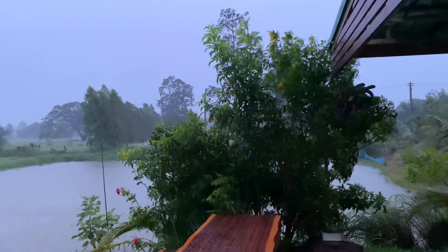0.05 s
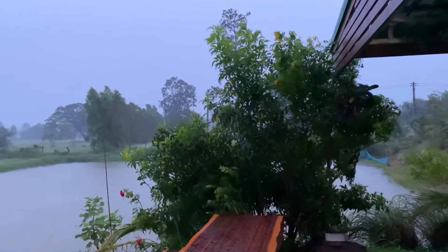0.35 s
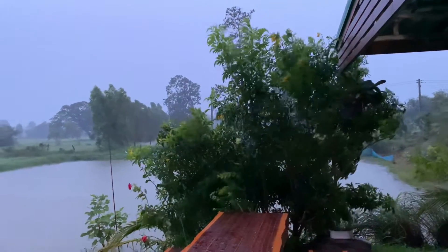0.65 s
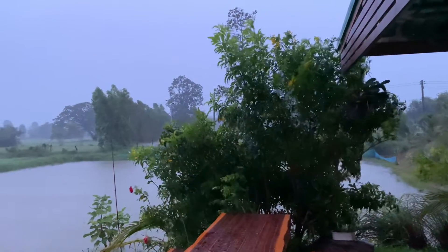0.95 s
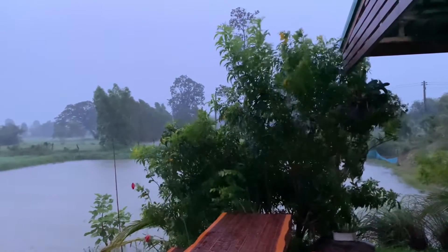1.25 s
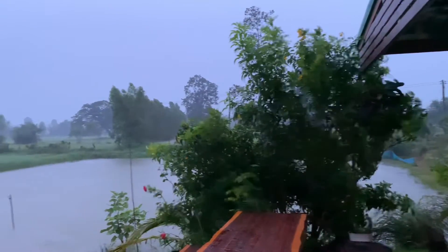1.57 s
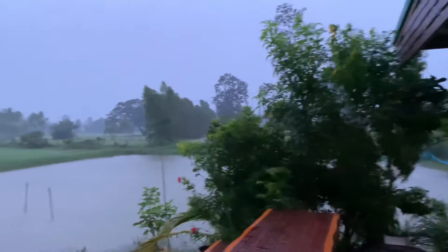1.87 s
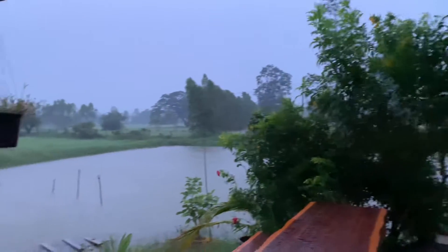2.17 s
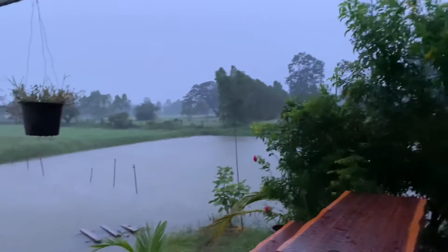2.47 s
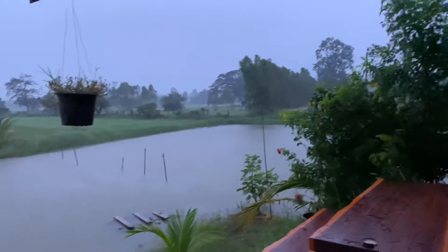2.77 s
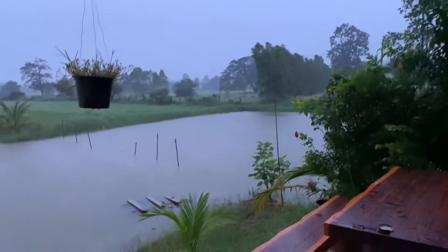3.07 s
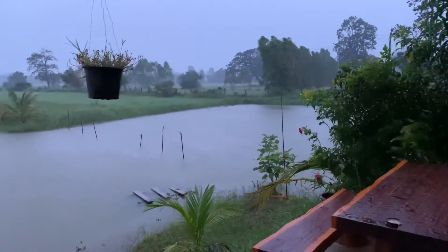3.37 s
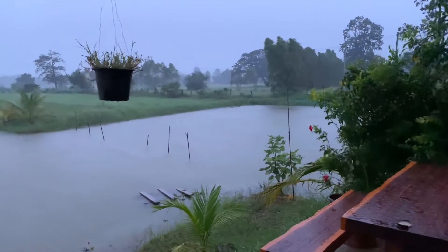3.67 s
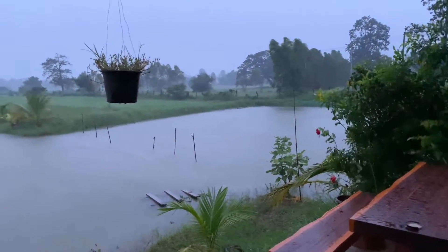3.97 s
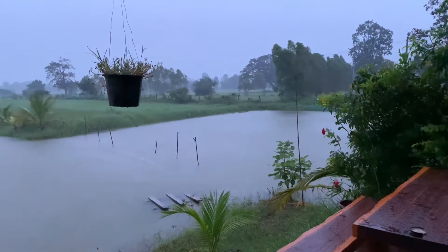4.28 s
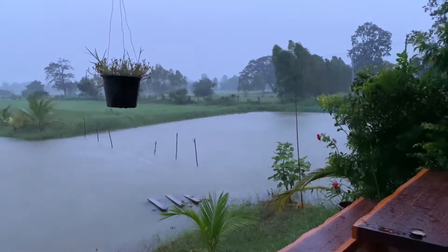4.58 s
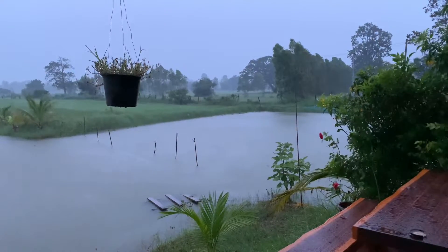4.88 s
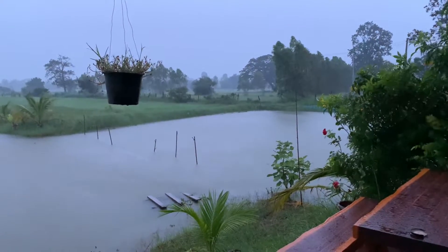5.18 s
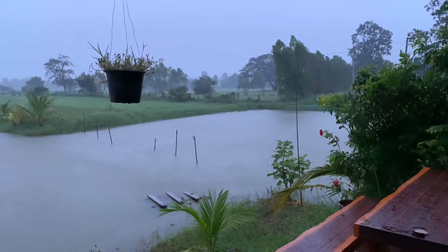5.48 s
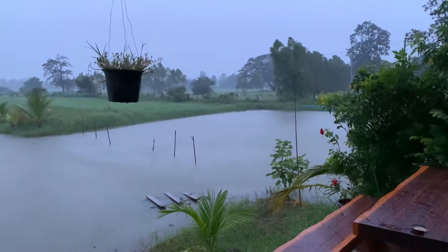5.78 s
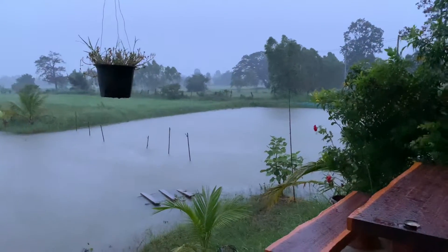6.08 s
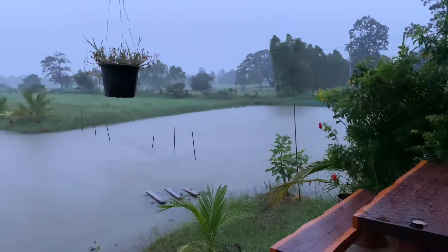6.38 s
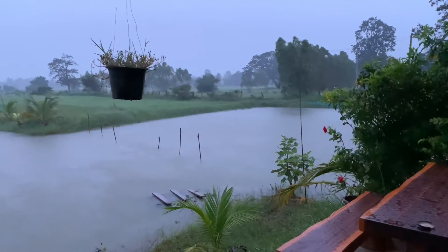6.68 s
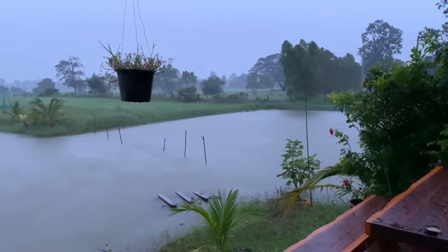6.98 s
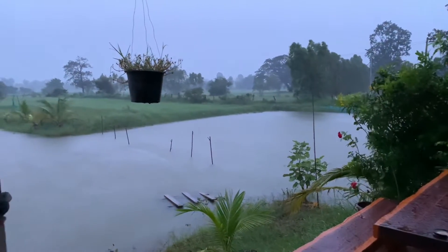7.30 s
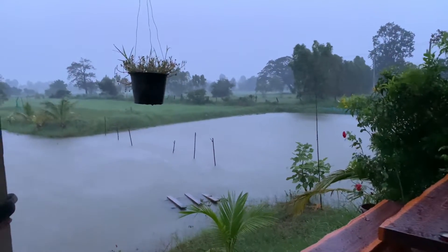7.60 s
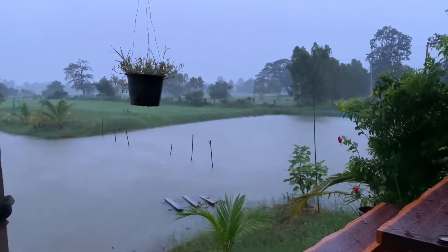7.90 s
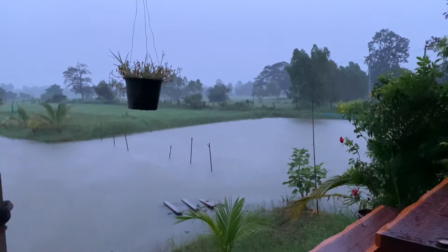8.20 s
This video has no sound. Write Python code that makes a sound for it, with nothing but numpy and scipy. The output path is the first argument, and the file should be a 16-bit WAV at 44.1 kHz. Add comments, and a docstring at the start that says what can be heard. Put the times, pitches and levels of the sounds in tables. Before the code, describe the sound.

A dense, even downpour on water and leaves, heard from under a veranda roof, with drips and light wind buffeting the microphone.

```python
"""Heavy tropical rain on a pond and fields, heard from under the eaves of a veranda.
Countless drops merge into a wash from all sides; nearer ones splash and tinkle into puddles.
The eaves ring, the roof drums softly, and spray hisses on a tree and on wet boards.
A light breeze rumbles on the two-port microphone and buffets it now and then."""
import sys
import numpy as np
from scipy import signal
from scipy.fft import rfft, irfft, next_fast_len
from scipy.io import wavfile
from scipy.ndimage import uniform_filter1d

SR = 44100
rng = np.random.default_rng(int(sys.argv[2]) if len(sys.argv) > 2 else 0)


def unload_wav(signal):
    """Save mono or channel-first audio to the path in sys.argv[1] as 16-bit WAV at rate SR, clipped to [-1, 1]."""
    wavfile.write(
        sys.argv[1],
        SR,
        np.round(np.clip(np.atleast_2d(signal).T, -1, 1) * 32767).astype(np.int16),
    )


N = 372644
TIME = np.arange(N) / SR


# tone of rain on water and grass: f/Hz, level/dB
WASH_EQ = [(150, -7), (270, -2.5), (350, -1.5), (540, -5.5), (750, -4.5), (1100, -1.5), (1650, -4),
           (2000, -3), (2450, -3.5), (2800, -8.5), (3550, -7.5), (4050, -13), (4900, -15.5), (6400, -20.5),
           (8000, -64)]
def wash(edge_db, flicker_db):
    """The main bed: steady sheets of rain all round, loudest at the two sides."""
    out = 0
    for bearing in np.linspace(-1, 1, num=9):
        sheet = impacts(per_s=9000, spread_db=1) * undb(flicker_db * walk(6) + edge_db * bearing ** 4)
        out = out + ports(sheet, bearing)
    return colour(out, WASH_EQ)


# tone of splashes in puddles and on the ground: f/Hz, level/dB
SPLASH_EQ = [(700, -2), (1600, -5.5), (2150, 1.5), (2560, -0.5), (2900, -3.5), (3650, -1.5), (4200, -7.5),
             (5500, -21), (8000, -47)]
def splashes(per_s, spread_db, decay_ms, edge_db):
    """Fat drops burst all round, each throwing a short spatter of droplets."""
    tail = np.exp(-TIME[:SR // 20] * 1000 / decay_ms)
    out = 0
    for bearing in np.linspace(-1, 1, num=5):
        power = signal.fftconvolve(impacts(per_s, spread_db) ** 2, tail ** 2)[:N]
        spatter = np.sqrt(np.abs(power)) * rng.standard_normal(N)
        out = out + ports(spatter, bearing) * undb(edge_db * bearing ** 4)
    return colour(out, SPLASH_EQ)


# resonances of the eaves: f/Hz, bandwidth/Hz, relative level/dB
EAVES_MODES = [(249, 53, -8), (370, 10, -1), (718, 99, 2), (1690, 87, -5), (2455, 155, -4.5),
               (3647, 120, -6)]
# fader ride of the eaves within the rain: t/s, level/dB
EAVES_RIDE = [(0, -7.5), (0.6, -4.5), (1.15, -4.5), (1.7, -6.5), (3.0, -7.5), (4.0, -7), (5.0, -6),
              (8.45, -7.5)]
def eaves(flurry_db, detune, sheets):
    """Drops ring sheets tuned a little apart; each takes its own flurries, so the ring shifts about."""
    out = 0
    for hz, width, db in EAVES_MODES:
        for place in np.linspace(-1, 1, sheets):
            drops = np.array([impacts(per_s=1500, spread_db=2.5) for _ in range(2)])
            mode = signal.iirpeak(hz + detune * width * place, hz / width, fs=SR)
            out = out + signal.lfilter(*mode, drops) * undb(db + flurry_db * walk(14))
    return unit(out) * undb(curves(EAVES_RIDE)[0])


# tone of rain on the roof: f/Hz, level/dB
ROOF_EQ = [(40, -22), (100, -5), (170, 0), (250, 0), (320, -2.5), (420, -2.5), (600, -9), (1200, -25),
           (6000, -44)]
# fader ride of the roof within the rain: t/s, level/dB
ROOF_RIDE = [(0, -4), (0.35, -9), (0.7, -11), (1.25, -8.5), (1.8, -10), (2.5, -9), (3.0, -7), (3.6, -7),
             (4.3, -7), (5.2, -8), (6.5, -8), (7.5, -8.5), (8.45, -5.5)]
def roof(side_db):
    """Drops on the roof blur into a dull, wide drumming."""
    mid, side = (impacts(per_s=4000, spread_db=4) for _ in range(2))
    return colour(mid_side(mid, side, side_db), ROOF_EQ) * undb(curves(ROOF_RIDE)[0])


# tone of rain on leaves: f/Hz, level/dB
LEAVES_EQ = [(2000, -16), (4500, -7), (5400, -6), (6300, -.5), (7600, 0), (8600, .5), (10000, 0),
             (12000, -1), (12700, -4), (14500, -6), (15500, -3)]
def leaves(bearing, flicker_db):
    """Fine spray on one tree: a bright hiss from a single direction."""
    hiss = colour(impacts(per_s=45000, spread_db=3.5), LEAVES_EQ)
    return ports(hiss * undb(flicker_db * walk(23)), bearing)


def patter(low_hz, high_hz, cycles, spread_db, pan_db, count):
    """Drips from eaves and leaves tinkle into water, each rising a little in pitch like a small bubble."""
    out = np.zeros((2, N + SR))
    for when, pitch, ring, size, side in rng.random((count, 5)):
        hz = low_hz * (high_hz / low_hz) ** pitch
        life = cycles * (.5 + ring) / hz  # seconds to fade by 60 dB
        age = np.arange(int(life * SR)) / SR
        chirp = np.sin(2 * np.pi * hz * age * (1 + 0.044 * age / life))
        drop = chirp * np.exp(-np.log(1000) * age / life)
        db = -spread_db * np.log(size + 0.19) + pan_db * (side - .5) * np.array([[1], [-1]])
        start = int(when * N)
        out[:, start:start + len(drop)] += drop * undb(db)
    return unit(out[:, :N])


# tone of spray on wet boards: f/Hz, level/dB
BOARDS_EQ = [(3000, 3), (4400, 20), (5100, 7.5), (6100, 17), (7000, 16.5), (8000, -18), (10000, -56)]
def boards(left_db):
    """Spray sizzles on the boards close by on the right, shaded from the left port."""
    spray = np.array([impacts(per_s=14000, spread_db=2.5) for _ in range(2)])
    return colour(spray, BOARDS_EQ) * undb([[left_db], [0]])


def mottle(x, patchy_db, frame, smoothing):
    """Random level flicker in each narrow band gives the rain a coarse, patchy texture."""
    hz, _, bands = signal.stft(x, SR, nperseg=frame)
    patches = rng.standard_normal(bands.shape[1:])
    for axis in (0, 1):  # across frequency, then time
        patches = uniform_filter1d(patches, smoothing, axis=axis)
    depth_db = patchy_db * np.minimum(hz / 1800, 1)[:, None]  # the low end stays steadier
    gain = undb(depth_db * np.minimum(unit(patches), 1.5))
    gain /= np.sqrt(np.mean(gain ** 2, axis=1, keepdims=True))
    return signal.istft(bands * gain, SR, nperseg=frame)[1][:, :N]


def veranda(x, echo_db, sway_ms, count):
    """Early reflections off table, roof and wall; their delays drift as the hand-held microphone sways."""
    out = x.copy()
    for ms in rng.uniform(1.96, 22, count):
        then = TIME - (ms + sway_ms * walk(1)) / 1000
        echo = np.array([np.interp(then, TIME, channel) for channel in x])
        out += undb(echo_db) * rng.choice([-1, 1]) * echo
    return out


# wind hits on the microphone: crest t/s, relative level/dB, eddy f/Hz, half length/ms
BUFFET_CUES = [(0.07, -26.5, 71.7, 15.5), (0.28, -32.5, 81.8, 23), (0.392, -35, 68, 22),
               (0.648, -29.5, 54.6, 30), (0.743, -23.5, 70.2, 17), (0.79, -26, 58.3, 24),
               (0.859, -29.5, 67.7, 15), (0.903, -28.5, 62, 19), (1.01, -33.5, 95, 28),
               (1.122, -37, 100.2, 18), (1.327, -22, 87.95, 16), (1.364, -20.5, 96.2, 14.6),
               (1.406, -24.5, 71.9, 20), (1.436, -27, 164.9, 8), (1.458, -26.5, 56, 27),
               (1.553, -28.5, 60.04, 15), (1.693, -35.5, 72, 22), (1.824, -28, 108, 9.5),
               (1.843, -26, 89.6, 11), (2.043, -19.5, 72, 23.2), (2.088, -28, 99, 20.5),
               (2.125, -32, 68, 17.3), (2.174, -28, 99.6, 11), (2.194, -22.5, 159.7, 11),
               (2.232, -27, 60, 22.5), (2.356, -36, 90.2, 26), (3.159, -34, 85, 16),
               (3.88, -38.5, 95.2, 36), (4.495, -31, 64, 21), (4.546, -29.5, 70, 18.3),
               (4.744, -32.5, 62, 21), (5.355, -30, 59.66, 35), (5.43, -31.5, 74.7, 37),
               (5.512, -34.5, 79.7, 19), (5.565, -36.5, 120, 20.7), (5.65, -32, 69.9, 28),
               (6.178, -31, 65.7, 23), (6.278, -38.5, 80, 20.5), (6.653, -29.5, 54, 18),
               (6.729, -32, 72, 20), (7.269, -34, 68, 17), (7.545, -33, 80, 21), (8.001, -26.5, 83.86, 15),
               (8.068, -30.5, 98.3, 18), (8.12, -23, 52, 18), (8.139, -24.5, 120, 11), (8.165, -33, 62, 11),
               (8.362, -29.5, 80.2, 20), (8.415, -34, 100, 22)]
def buffets(gain_db, wander, fine_db, fine_speed, side_db):
    """Each puff of air swings the pressure at both ports a few uneven times and sheds finer eddies."""
    power, weighted_hz = np.zeros(N), np.zeros(N)
    for crest, peak_db, hz, half_ms in BUFFET_CUES:
        age = (TIME - crest) * 1000 / half_ms
        puff = (undb(peak_db) * np.exp(-np.minimum(age ** 2, 20))) ** 2
        power += puff
        weighted_hz += puff * hz
    swing_hz = weighted_hz / power * np.exp(wander * walk(260))
    swing = unit(np.sin(2 * np.pi * np.cumsum(swing_hz) / SR))
    mid = swing + undb(fine_db) * turbulence(fine_speed)
    return undb(gain_db) * np.sqrt(power) * mid_side(mid, turbulence(speed=1), side_db)


# fader ride of the breeze: t/s, relative level/dB
BREEZE_RIDE = [(0, -46), (0.2, -41), (0.52, -44), (0.8, -46), (1.15, -41), (1.5, -41), (1.75, -43),
               (2.15, -42), (2.6, -52.5), (3.5, -50), (3.9, -45), (4.6, -44), (5.2, -46), (5.45, -43),
               (5.75, -42.5), (6.1, -42.5), (6.55, -43.5), (6.9, -48), (7.2, -42), (7.8, -42.5),
               (8.45, -39.5)]
def breeze(side_db, flutter_db):
    """Air over the microphone makes a low, fluttering rumble, partly different at each port."""
    mid, side = turbulence(speed=1), turbulence(speed=0.74)
    db = curves(BREEZE_RIDE)[0] + flutter_db * walk(18)
    return mid_side(mid, side, side_db) * undb(db)


# tone of eddies at the microphone, at speed 1: f/Hz, level/dB
EDDY_EQ = [(20, -23), (35, -9), (48, 4), (62, 2.5), (80, 0), (120, -6), (180, -13), (260, -26), (400, -42),
           (1500, -80)]
def turbulence(speed):
    """Eddy pressure, levelled to an even strength; faster air makes smaller, higher eddies."""
    x = colour(rng.standard_normal(N), [(hz * speed, db) for hz, db in EDDY_EQ])
    return x / np.sqrt(uniform_filter1d(x ** 2, int(.03 * SR)) + .02)


def impacts(per_s, spread_db):
    """Drop impacts at random moments, many small and a few large."""
    falls = rng.random(N) < per_s / SR
    size = undb(spread_db * np.minimum(rng.exponential(size=N), 5))
    return unit(falls * size * rng.choice([-1, 1], N))


def ports(x, bearing, port_to_port_ms=0.2942):
    """Pan by delay: sound from the left (-1) to the right (1) reaches the nearer port first."""
    taps = np.arange(-24, 25)
    lag = np.clip(bearing, -1, 1) * port_to_port_ms * SR / 2000  # samples, half the trip each way
    window = np.kaiser(len(taps), 2)
    return np.array([np.convolve(x, np.sinc(taps - d) * window, "same") for d in (lag, -lag)])


def mid_side(mid, side, side_db):
    """Mid and side to left and right; side_db sets the width."""
    return mid + undb(side_db) * np.array([side, -side])


def colour(x, points):
    """EQ through (f/Hz, level/dB) points, rolling off below the first; rms 1."""
    hz, db = np.transpose(points)
    size = next_fast_len(N, real=True)
    freq = np.arange(size // 2 + 1) * SR / size
    gain = undb(np.interp(np.log(freq + 1), np.log(hz), db)) * np.minimum(freq / hz[0], 1) ** 2
    return unit(irfft(rfft(x, size) * gain, size)[..., :N])


def walk(rate_hz):
    """Smooth random modulation; rms 1."""
    step = int(SR / rate_hz)
    held = np.repeat(rng.standard_normal(N // step + 1), step)
    return unit(uniform_filter1d(uniform_filter1d(held, step), step)[:N])


def curves(table):
    """One automation lane for each column after t/s, in straight ramps."""
    times, *columns = np.transpose(table)
    return [np.interp(TIME, times, column) for column in columns]


def undb(db):
    """Decibels to gain."""
    return 10 ** (np.asarray(db) / 20)


def unit(x):
    """Scale to rms 1."""
    return x / np.sqrt(np.mean(x ** 2))


# fader rides of the downpour: t/s, rain bus level/dB, then splash level/dB and spray level/dB into it
SHOWER_RIDES = [(0, -31, -18, -11.5), (0.65, -31, -8, -11), (1.05, -31, -5, -9.5), (1.5, -31.5, -6, -11),
                (2.0, -30.5, -9, -13), (2.55, -32.5, -3.5, -11.5), (2.95, -30, -5.5, -12),
                (3.3, -31, -5.5, -10.5), (3.9, -33, -3.5, -10.5), (4.4, -32, -4, -10),
                (4.8, -32.5, -2.5, -11), (5.02, -30.5, -10.5, -14), (5.2, -30, -14, -14.5),
                (5.7, -31.5, -7, -11.5), (6.25, -30.5, -7.5, -13.5), (6.8, -31.5, -8, -13),
                (7.2, -31, -4, -11.5), (7.75, -31, -11, -12.5), (8.45, -31.5, -5, -12.5)]
def scene():
    """All rain layers share one bus that follows the strength of the shower; the wind comes on top."""
    rain_db, splash_db, spray_db = curves(SHOWER_RIDES)
    rain = undb(-1.5) * wash(edge_db=6.5, flicker_db=0.07)
    rain += eaves(flurry_db=2.1, detune=0.46, sheets=2)
    rain += undb(splash_db) * splashes(per_s=380, spread_db=1.0, decay_ms=9, edge_db=2.5)
    spray = undb(3) * leaves(bearing=0.604, flicker_db=0.7) + boards(left_db=-6.5)
    rain += undb(spray_db) * spray
    rain += roof(side_db=-1.5)
    rain += undb(-10) * patter(low_hz=1300, high_hz=3950, cycles=75, spread_db=2.5, pan_db=12, count=3500)
    rain = mottle(rain, patchy_db=2.0, frame=1024, smoothing=3)
    wind = undb(2) * breeze(side_db=-5.5, flutter_db=3)
    wind += buffets(gain_db=0.2, wander=0.33, fine_db=-10.5, fine_speed=2.3, side_db=-13)
    return veranda(rain, echo_db=-21, sway_ms=0.5, count=10) * undb(rain_db) + wind


def record(dry, low_cut_hz=30, high_cut_hz=15750):
    """The recorder cuts the deepest rumble and the very top."""
    dry = signal.sosfilt(signal.butter(3, low_cut_hz, "high", fs=SR, output="sos"), dry)
    return signal.sosfilt(signal.ellip(10, .2, 80, high_cut_hz, fs=SR, output="sos"), dry)


dry = scene()
out = record(dry)
unload_wav(out)
```